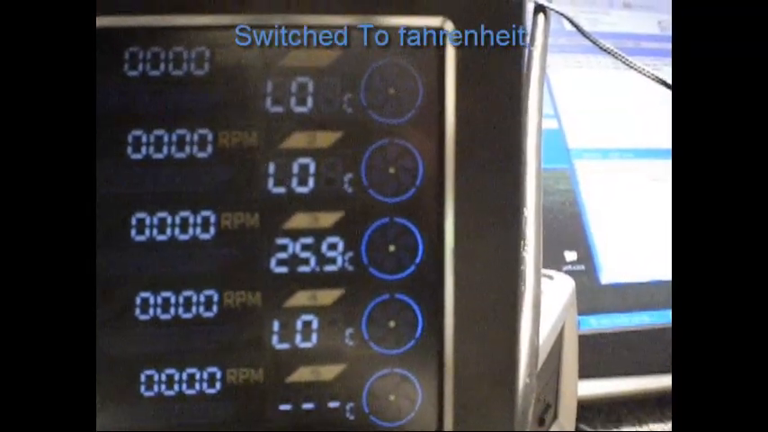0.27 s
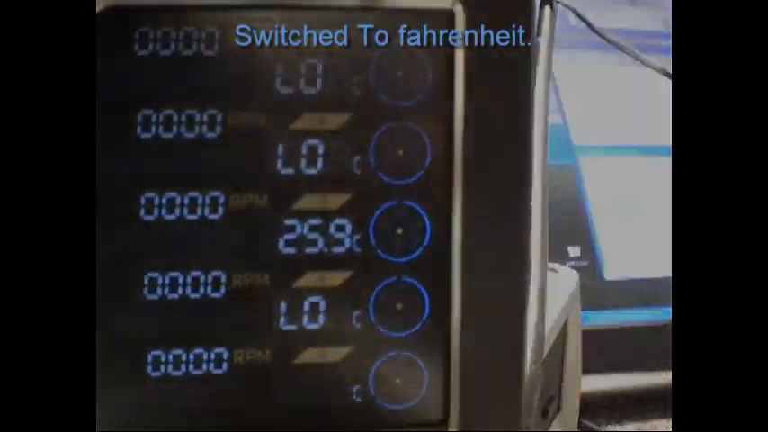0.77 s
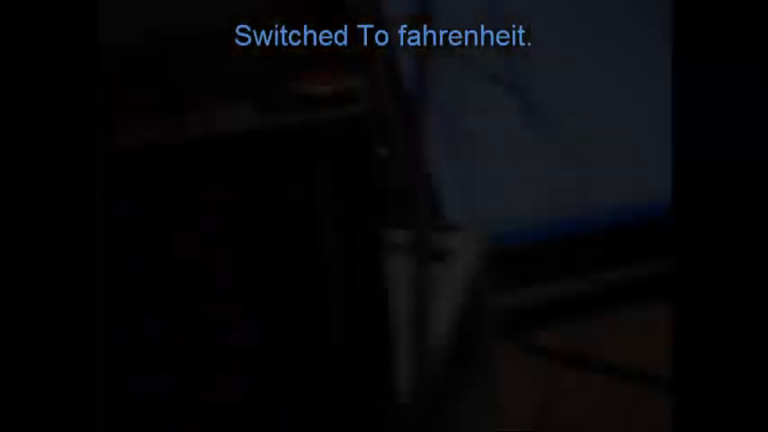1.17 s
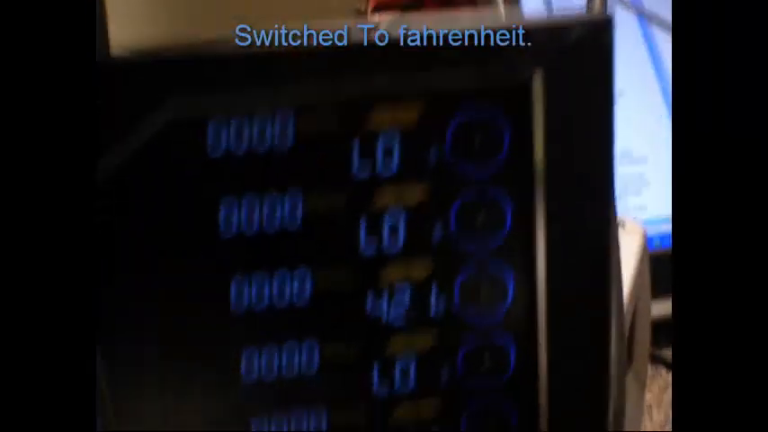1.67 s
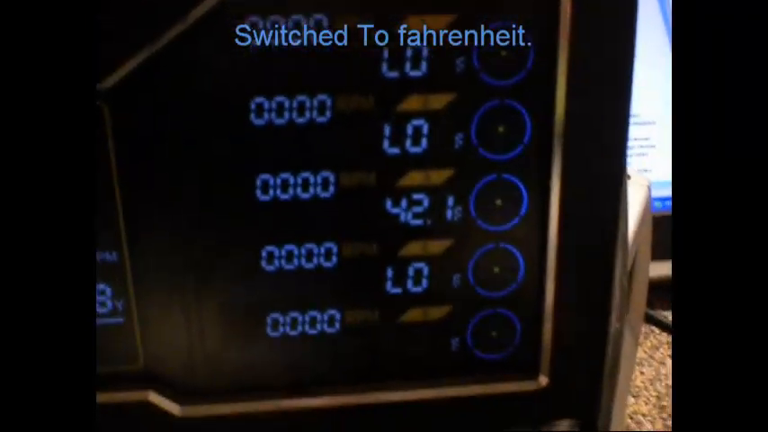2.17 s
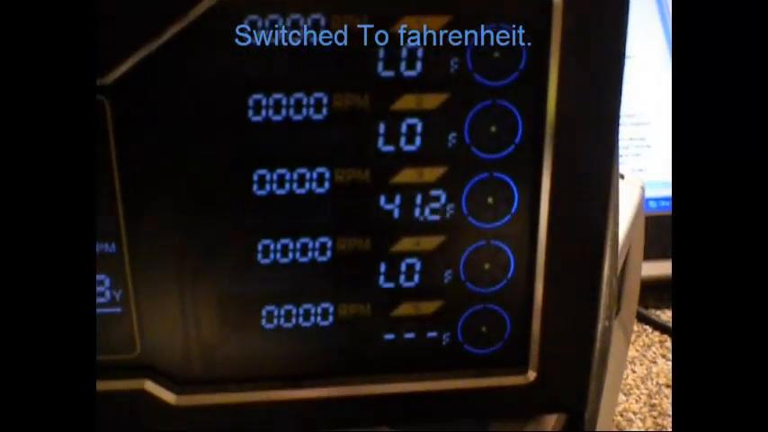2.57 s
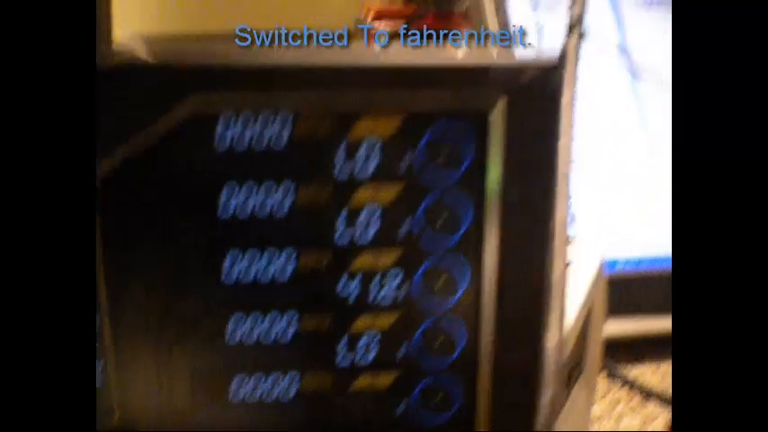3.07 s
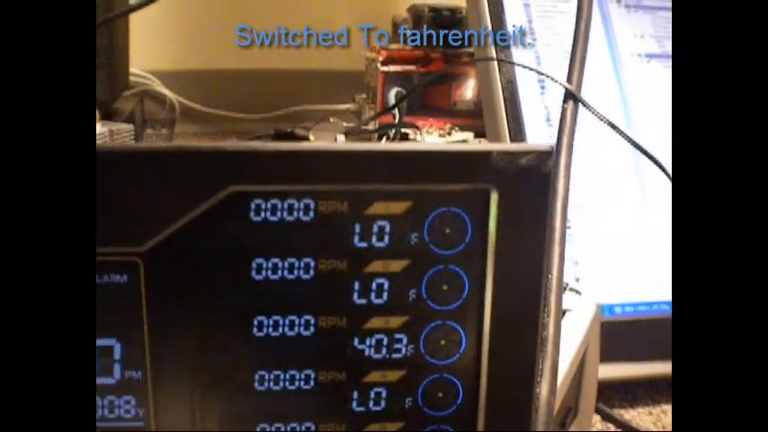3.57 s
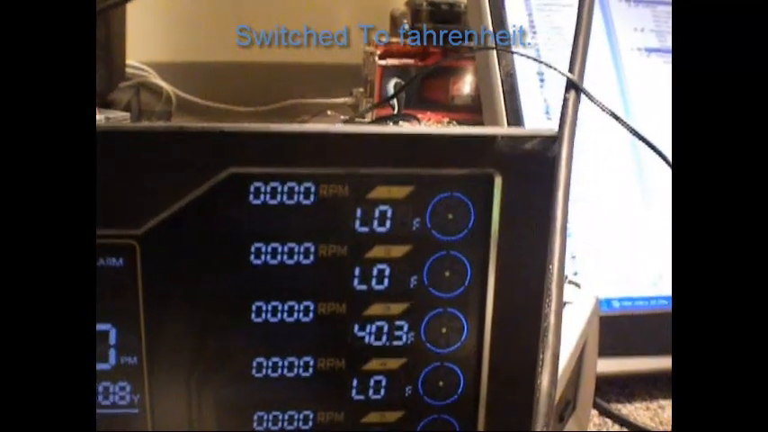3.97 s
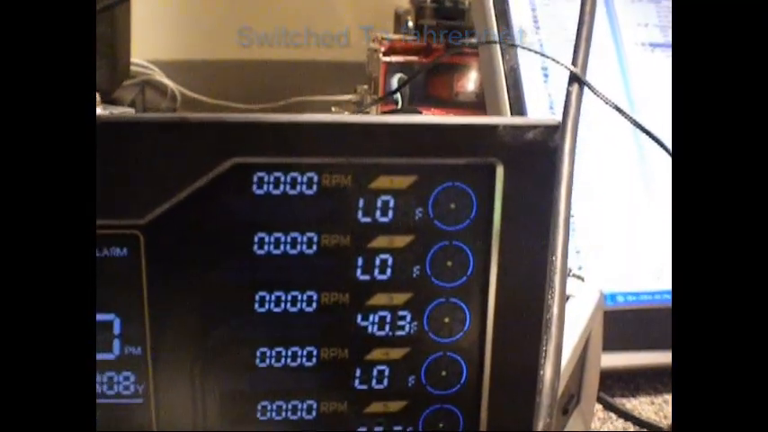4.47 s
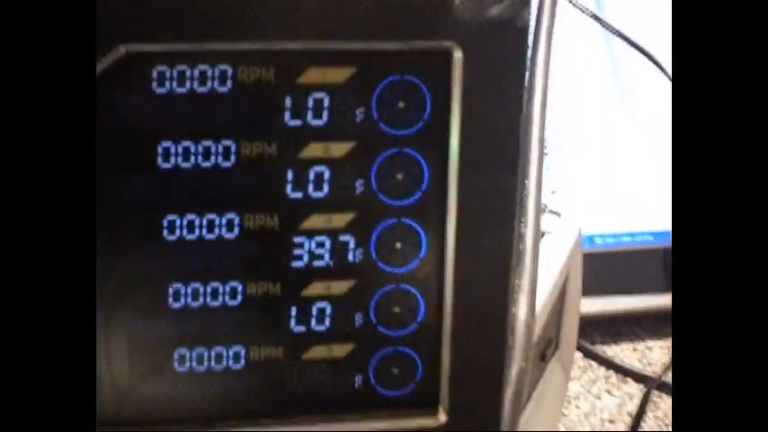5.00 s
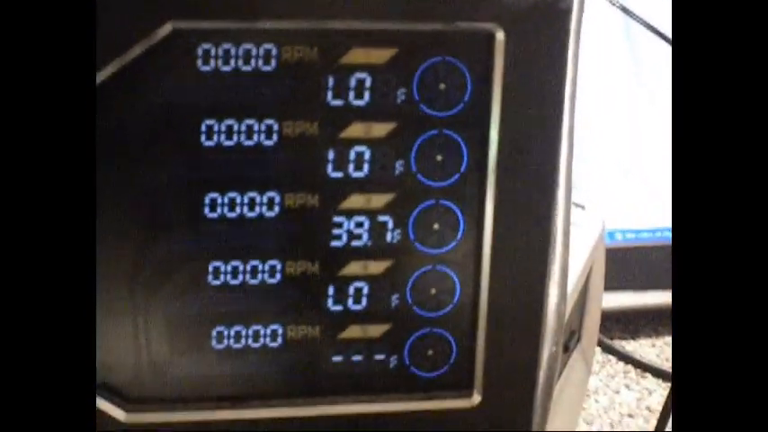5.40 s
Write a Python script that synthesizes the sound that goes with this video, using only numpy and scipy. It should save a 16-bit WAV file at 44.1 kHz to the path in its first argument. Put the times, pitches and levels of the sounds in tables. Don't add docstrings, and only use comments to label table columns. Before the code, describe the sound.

A soft distant whoosh of computer fans cuts to brief silence, then returns as loud close airflow with blade hum and motor whine.

```python
import sys
import numpy as np
from scipy import signal
from scipy.fft import rfft, irfft, next_fast_len
from scipy.io import wavfile
from scipy.ndimage import uniform_filter1d, map_coordinates

SR = 44100
rng = np.random.default_rng(int(sys.argv[2]) if len(sys.argv) > 2 else 0)


def dump_mix(stems):
    frames = np.atleast_2d(stems).T
    limited = np.clip(frames, -1, 1)
    pcm = np.round(limited * 32767).astype(np.int16)
    wavfile.write(sys.argv[1], SR, pcm)


def decibels_to_gain(level_db):
    exponent = np.asarray(level_db, float) / 20
    return 10 ** exponent


N = 248724
TIME = np.arange(N) / SR
BLADE_SHAFT_HZ = 96.42
POLE_HZ = 297.75
SILENCE_START_S, SILENCE_END_S = 1.186, 1.2252


def unit(x):
    return x / np.sqrt(np.mean(x ** 2) + 1e-20)


def wobble(rate):
    knots = rng.standard_normal(int(N * rate / SR) + 4)
    return map_coordinates(knots, [np.arange(N) * rate / SR])


def along(points, hz):
    f, value = np.transpose(points)
    return np.interp(np.log(hz + 1), np.log(f + 1), value)


def filtered(x, response):
    m = next_fast_len(N + 8192)
    spectrum = rfft(x, m) * response(np.fft.rfftfreq(m, 1 / SR))
    return irfft(spectrum, m)[..., :N]


def airflow(colour, patchy_db):
    z = signal.stft(rng.standard_normal(N), nperseg=512)[2]
    patches = uniform_filter1d(rng.standard_normal(z.shape), 6, 0)
    patches = uniform_filter1d(patches, 14, 1)
    noise = signal.istft(z * decibels_to_gain(patchy_db * unit(patches)), nperseg=512)[1][:N]
    return unit(filtered(noise, lambda hz: decibels_to_gain(along(colour, hz))))


def tone(hz, db, sway_db, drift_s):
    phase = 2 * np.pi * (hz * (TIME + drift_s) + rng.random())
    return np.sqrt(2) * decibels_to_gain(db + sway_db * wobble(6.7)) * np.sin(phase)


# frequency [Hz], level per Hz [dB].
NEAR_AIR = [(60, -62), (107, -34.5), (250, -18.5), (610, -7), (740, -6.5), (1000, -10.5), (1300, -13.5),
            (1500, -14), (2180, -22), (2480, -18), (2750, -21), (3360, -19), (3950, -25), (4600, -65)]


def near_airflow():
    steady_db, shortfall_db, settle_s = -29, 1, .35
    since = np.maximum(TIME - SHOTS[1][0], 0)
    level_db = steady_db - shortfall_db * np.exp(-since / settle_s) + 0.19 * wobble(9)
    return decibels_to_gain(level_db) * airflow(NEAR_AIR, patchy_db=0.06)


# multiple of the shaft rate, level [dB], unsteadiness [dB].
BLADE_ORDERS = [(7, -32, .6), (8, -47, 2), (12, -44, 2), (21, -54, 1.5)]


def blade_tones():
    shaft_s = 6e-5 * wobble(1.2)
    return sum(tone(k * BLADE_SHAFT_HZ, db, sway, shaft_s) for k, db, sway in BLADE_ORDERS)


# moment [s], multiple of the pole rate, depth [dB], half length [s].
QUIET_SPOTS = [
    (1.24, 5, 17, .25),
    (2.2, 5, 8.5, .12),
    (2.78, 5, 17.5, .14),
    (4.0, 5, 7, .2),
    (4.7, 5, 10, 1.1),
    (2.8, 6, 11.5, .45),
    (4.4, 6, 6.5, .15),
    (1.6, 11, 16, .1),
    (3.28, 11, 4.5, .25),
    (4.35, 11, 12, .12),
]


def heard(order):
    spots = [(s, db, half) for s, k, db, half in QUIET_SPOTS if round(k) == order]
    return -sum(db * np.exp(-((TIME - s) / half) ** 2) for s, db, half in spots)


# multiple of the pole rate, level [dB], unsteadiness [dB].
POLE_ORDERS = [(6, -46, 1.2), (7, -59, 2), (8, -59, 2)]


def motor_tones():
    rotor_s = 6e-5 * wobble(2.5)
    poles = sum(tone(k * POLE_HZ, db + heard(k), sway, rotor_s) for k, db, sway in POLE_ORDERS)
    chop = 1 + .45 * np.sin(2 * np.pi * BLADE_SHAFT_HZ * TIME)
    whine = chop * tone(5 * POLE_HZ, -36 + heard(5), 0.65, rotor_s)
    whistle = tone(11 * POLE_HZ, -46.5 + heard(11), 1.2, rotor_s)
    return poles + whine + whistle


# frequency [Hz], level [dB], unsteadiness [dB].
NEAR_HUM = [(119.9, -63.5, 1), (1454, -52, 2), (2417, -58, 2), (2697, -61, 2), (2943, -57, 2),
            (3374.6, -51.5, 1.5)]


def near_fans():
    hum = sum(tone(hz, db, sway, 5e-5 * wobble(5)) for hz, db, sway in NEAR_HUM)
    return near_airflow() + blade_tones() + motor_tones() + hum


# frequency [Hz], level per Hz [dB].
FAR_AIR = [(60, -55), (107, -27.5), (250, -13.5), (420, -9), (560, -3.5), (690, -11.5), (1150, -16),
           (1850, -19.5), (2150, -26.5), (2650, -26), (2900, -22.5), (3500, -24), (3900, -23), (4500, -62)]
# frequency [Hz], level [dB], unsteadiness [dB].
FAR_HUM = [(119.9, -69, 2), (360.4, -55.5, 2), (553.8, -58, 2.5), (862.8, -62, 2), (1151, -59, 2),
           (2882, -64, 1.5), (3003, -69, 2)]


def far_fans():
    hum = sum(tone(hz, db, sway, 0.00018 * wobble(8)) for hz, db, sway in FAR_HUM)
    flow_db = -39.5 + 0.5 * wobble(3.4)
    return hum + decibels_to_gain(flow_db) * airflow(FAR_AIR, patchy_db=0.16)


# frequency [Hz], level [dB], unsteadiness [dB].
CASE_FANS = [(288.4, -49.5, 2.5), (282.3, -59, 2)]


def case_fans():
    return sum(tone(hz, db, sway, 1e-4 * wobble(8)) for hz, db, sway in CASE_FANS)


# moment [s], frequency [Hz], level [dB], length [s].
SQUEAKS = [
    (.62, 3500, -58, .06),
    (.6, 1590, -55, .05),
    (1.27, 1200, -36, .03),
]


def housing():
    total = 0
    for s, hz, db, length in SQUEAKS:
        swell = np.exp(-((TIME - s) / (length / 2)) ** 2)
        total = total + decibels_to_gain(db) * swell * np.sin(2 * np.pi * hz * TIME)
    return total


# start [s], end [s], fade-in [s], fade-out [s].
SHOTS = [
    (-.01, 1.1605, .001, .005),
    (1.2252, 5.7, .004, .001),
]


def scene():
    far_gate, near_gate = [np.clip((TIME - start) / rise, 0, 1) * np.clip((end - TIME) / fall, 0, 1)
                           for start, end, rise, fall in SHOTS]
    offset = -.0022
    both = offset + housing() + case_fans()
    mono = far_gate * (far_fans() + both) + near_gate * (near_fans() + both)
    return np.array([mono, mono])


# frequency [Hz], step against frame level [dB].
FAR_STEP = [(10, 0), (35, 10), (400, 8), (1000, 3), (2000, -2.5), (4000, -8.5), (8000, -12.5), (11000, -15)]
# frequency [Hz], step against frame level [dB].
NEAR_STEP = [(10, -3), (100, -2), (300, 3), (650, 6), (1000, 5), (2000, -1), (4000, -8), (8000, -11),
             (11000, -13)]


def blinking_bins(x):
    hop, grid, kept_bins = 1024, 48, 504
    n, k = np.arange(2 * hop), np.arange(kept_bins) + .5
    window = np.sin(np.pi * (n + .5) / (2 * hop))
    basis = window[:, None] * np.cos(np.pi / hop * np.outer(n + .5 + hop / 2, k))
    lead = 2 * hop - grid
    padded = np.pad(x, (lead, 3 * hop), "reflect")
    index = hop * np.arange(len(padded) // hop - 1)[:, None] + n
    bins = padded[index] @ basis * np.sqrt(2 / hop)

    far = index[:, -1:] - lead < SILENCE_END_S * SR
    hz = k * SR / (2 * hop)
    level = np.sqrt(np.sum(bins ** 2, 1, keepdims=True) / hop) + 1e-9
    level = level * decibels_to_gain(1.5 * rng.standard_normal(level.shape))
    step = level * decibels_to_gain(np.where(far, along(FAR_STEP, hz), along(NEAR_STEP, hz)))
    counts = np.floor(np.abs(bins / step) ** (3 / 4) + .4)
    kept = np.sign(bins) * counts ** (4 / 3) * step
    nearby = uniform_filter1d(np.abs(kept), size=7)
    kept = kept + decibels_to_gain(-28) * nearby * rng.standard_normal(kept.shape)

    frames = kept @ basis.T * np.sqrt(2 / hop)
    return np.bincount(index.ravel(), frames.ravel())[lead:][:N]


def band_limit(x):
    return signal.sosfilt(signal.butter(12, 11240, fs=SR, output="sos"), x)


def record(dry):
    sample_hz = 8001.45
    guarded = filtered(dry[0], lambda hz: 1 / np.sqrt(1 + (hz / 3900) ** 24))
    ticks = np.floor(np.arange(N) * sample_hz / SR) * SR / sample_hz
    held = map_coordinates(guarded, [ticks])
    mono = blinking_bins(held)
    mono = mono * ((TIME < SILENCE_START_S) | (TIME > SILENCE_END_S))
    mono = filtered(mono, lambda hz: np.clip((11050 - hz) / 200, 0, 1) ** 2)
    return band_limit(np.array([mono, mono]))


dry = scene()
out = record(dry)
dump_mix(out)
```